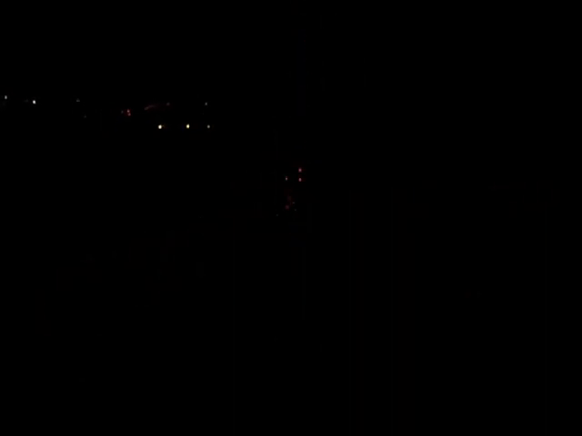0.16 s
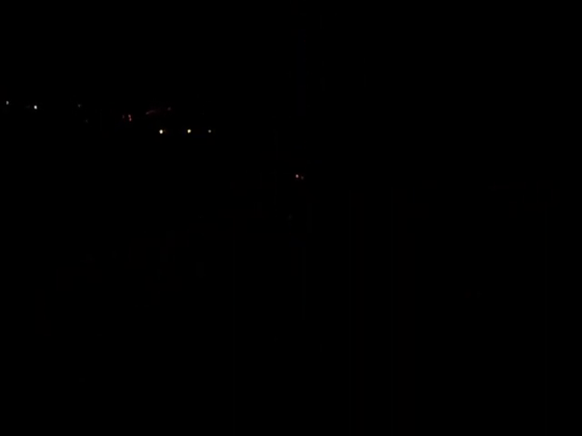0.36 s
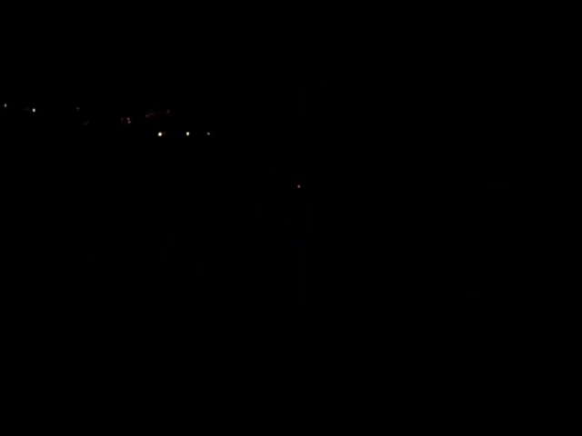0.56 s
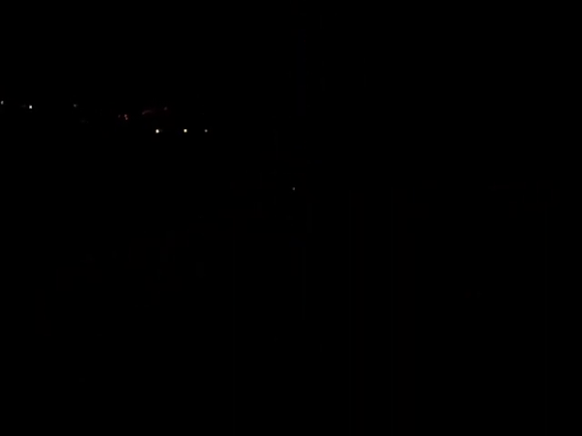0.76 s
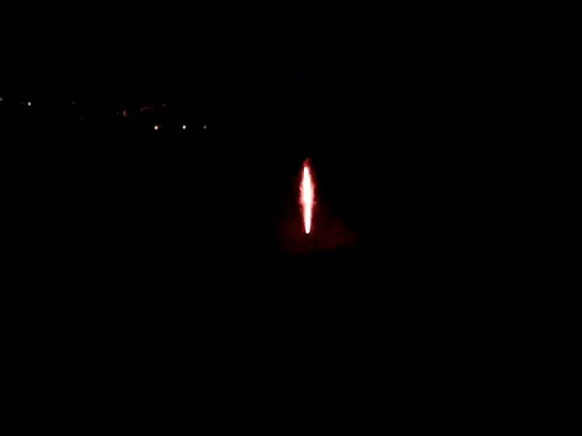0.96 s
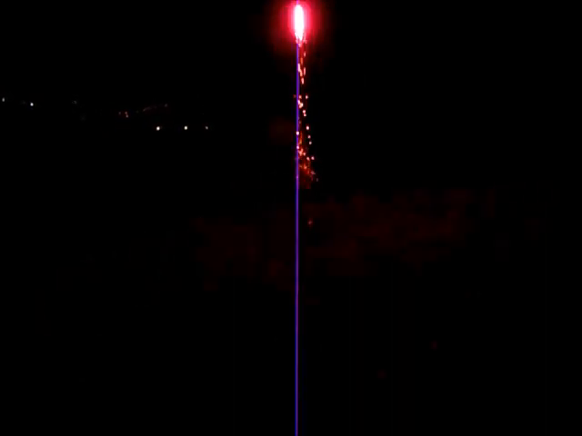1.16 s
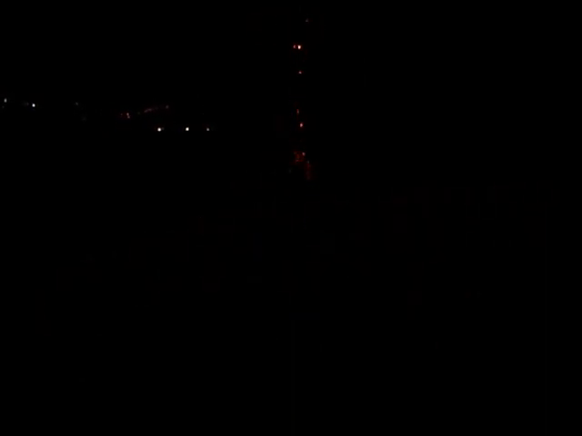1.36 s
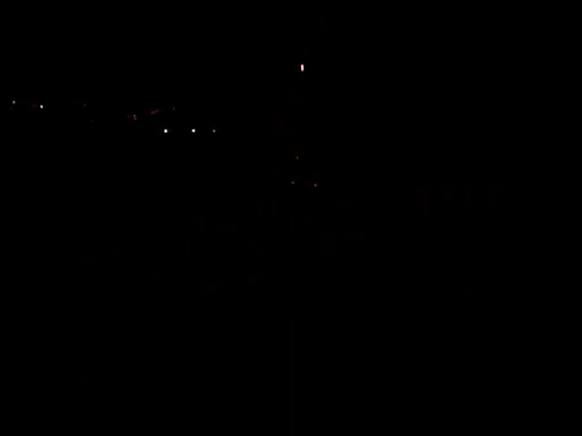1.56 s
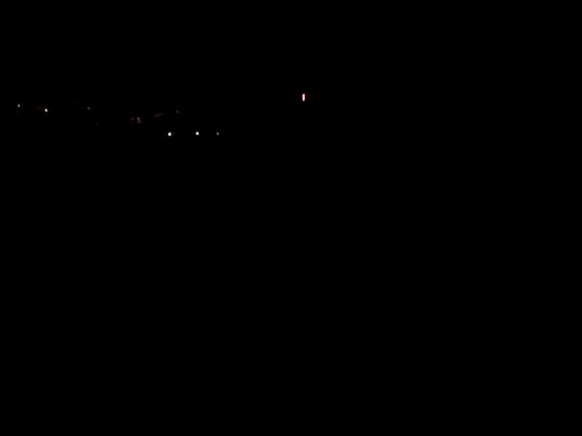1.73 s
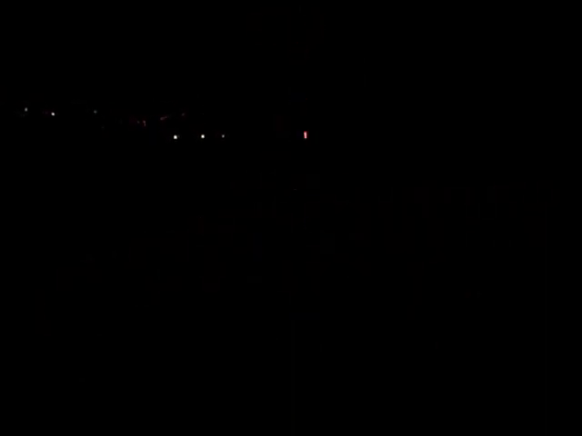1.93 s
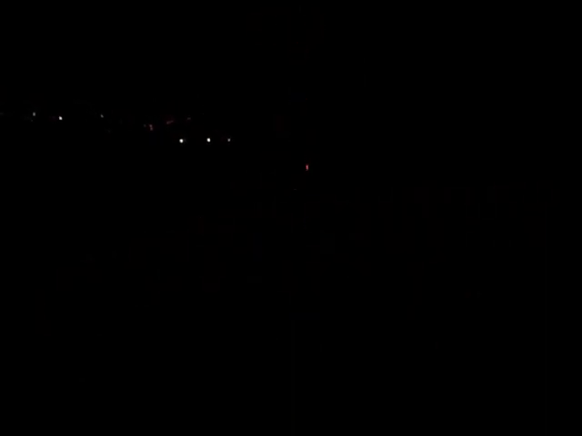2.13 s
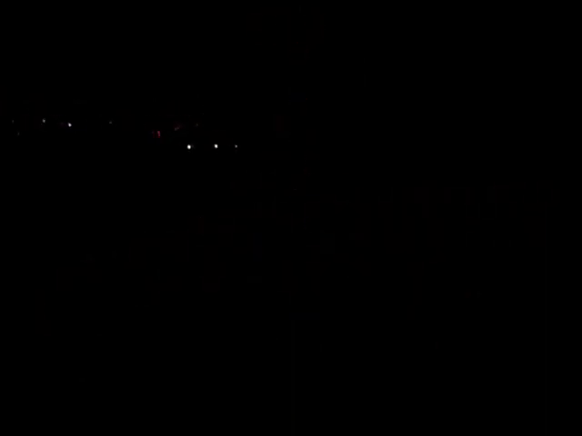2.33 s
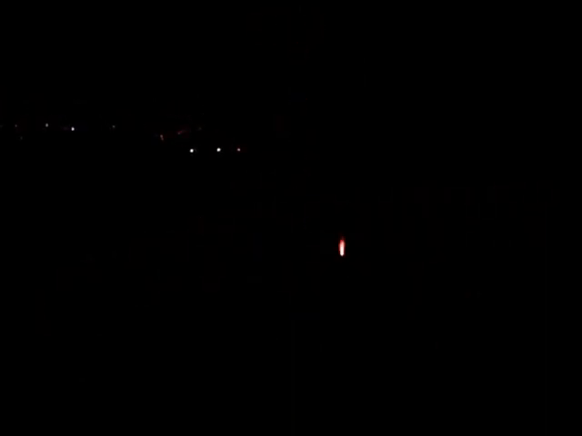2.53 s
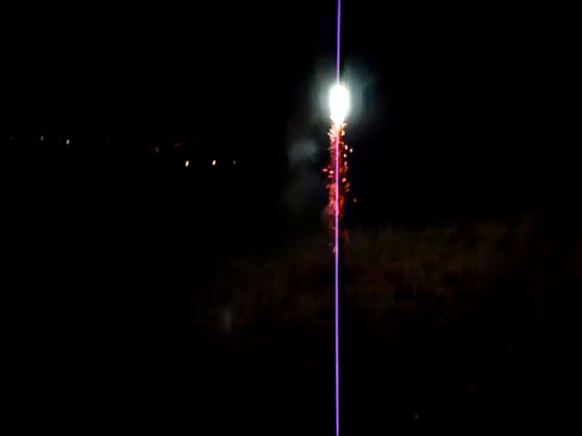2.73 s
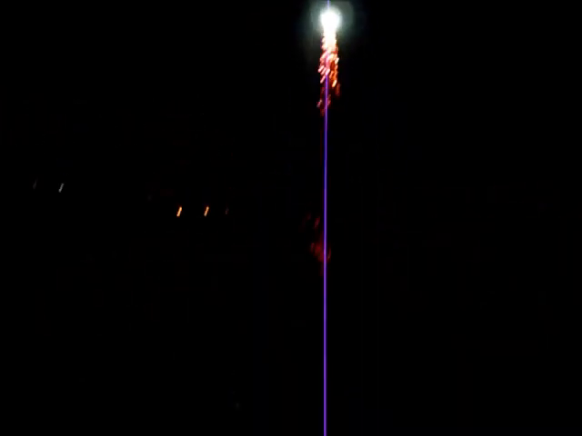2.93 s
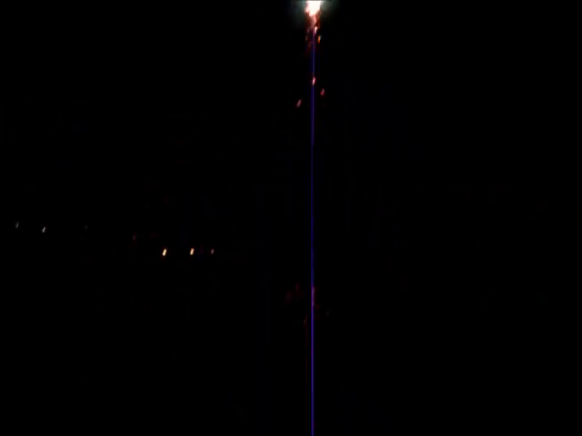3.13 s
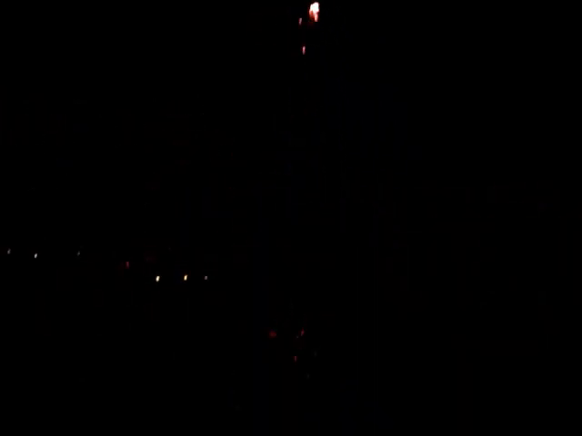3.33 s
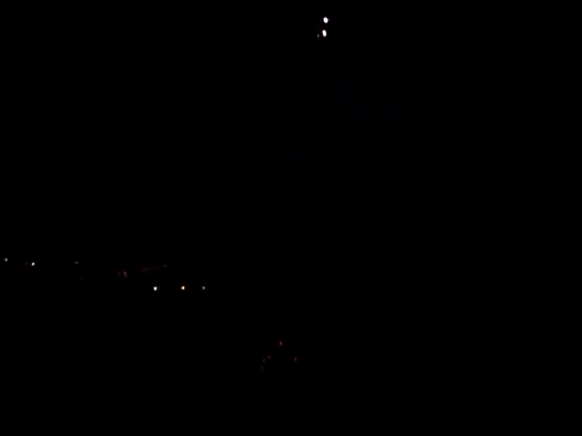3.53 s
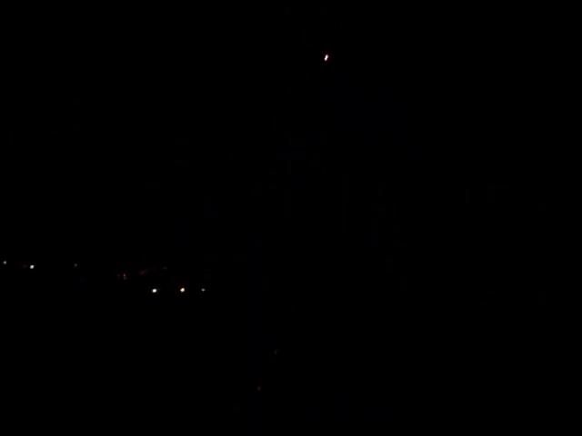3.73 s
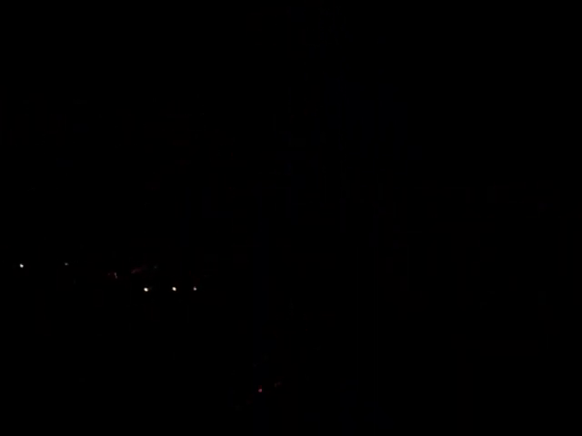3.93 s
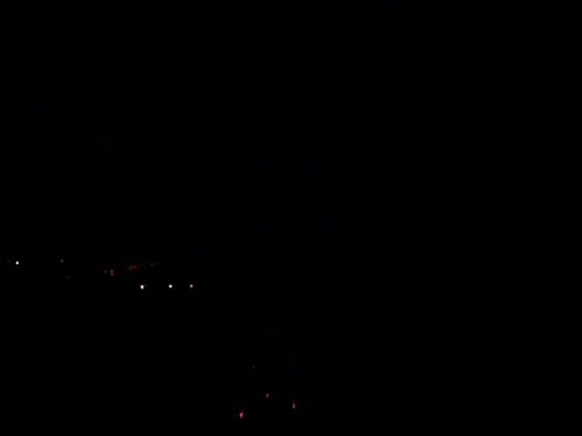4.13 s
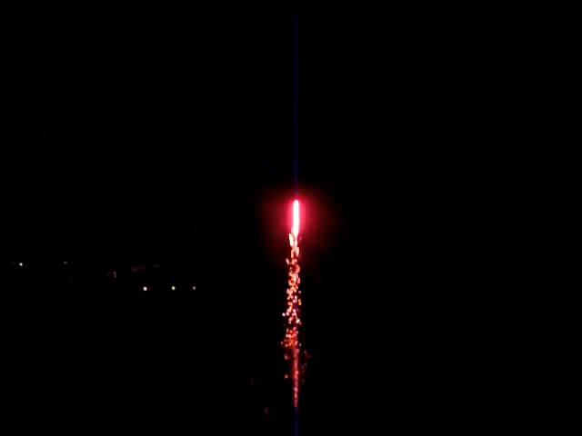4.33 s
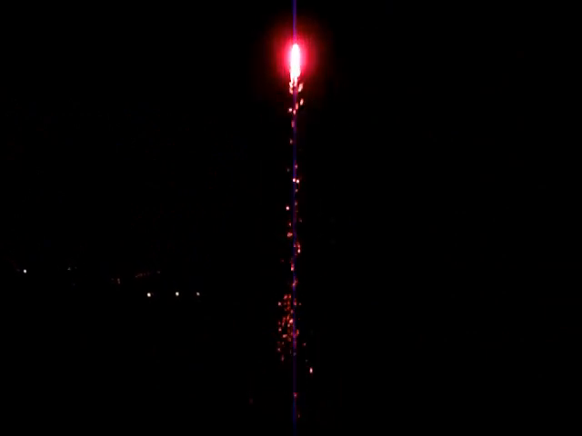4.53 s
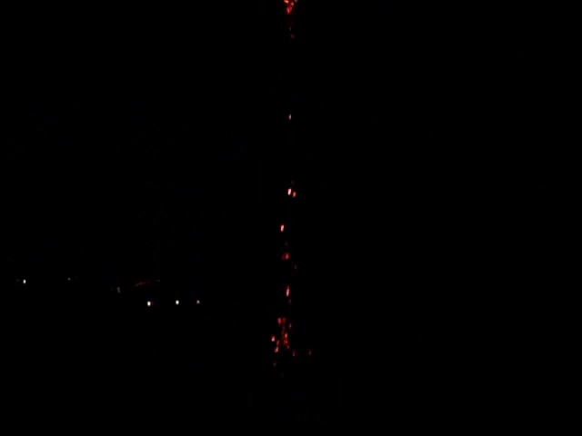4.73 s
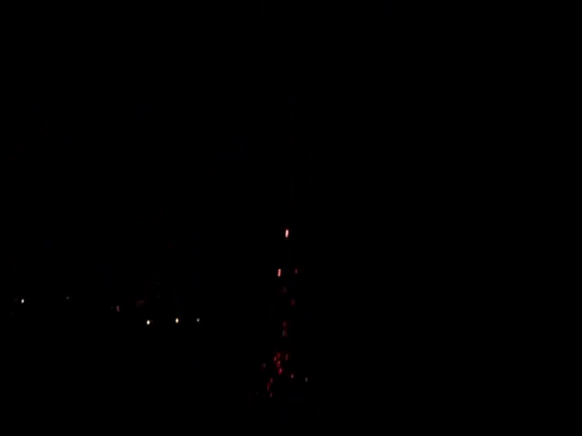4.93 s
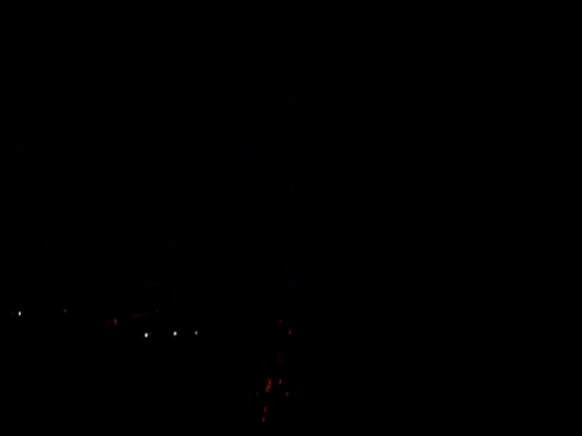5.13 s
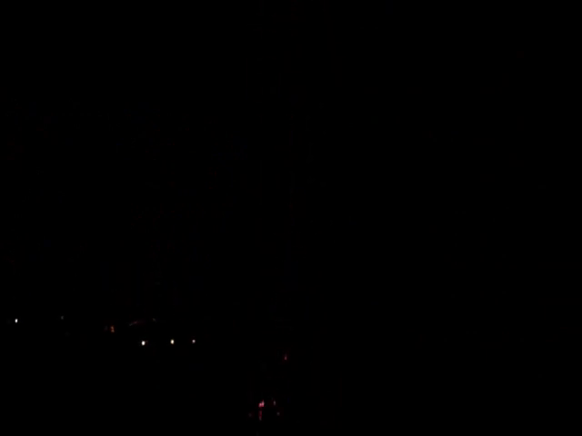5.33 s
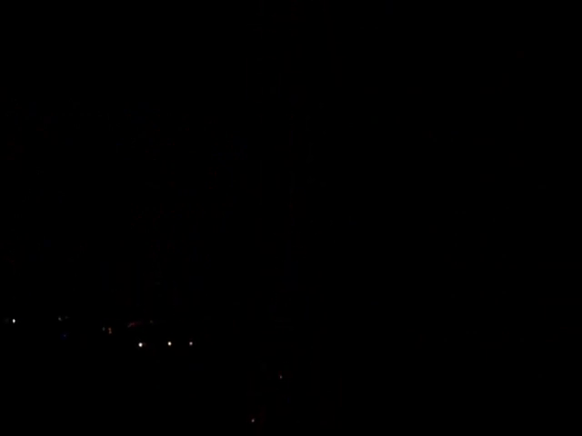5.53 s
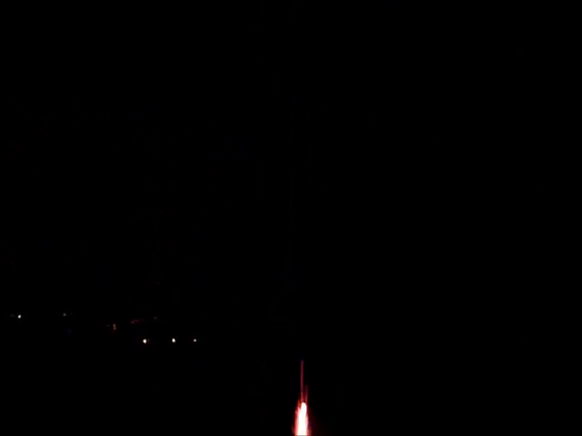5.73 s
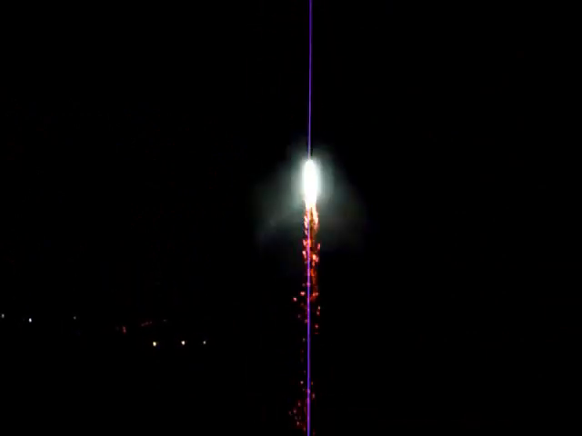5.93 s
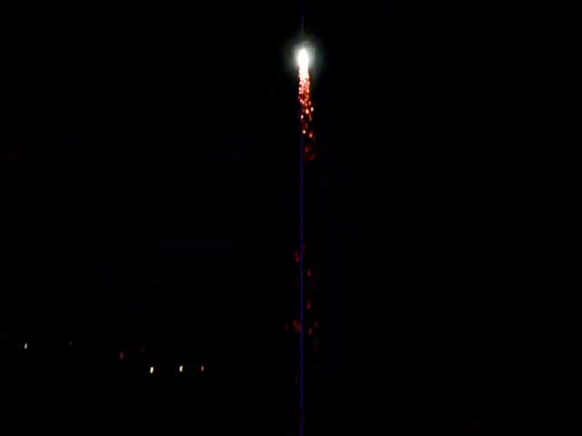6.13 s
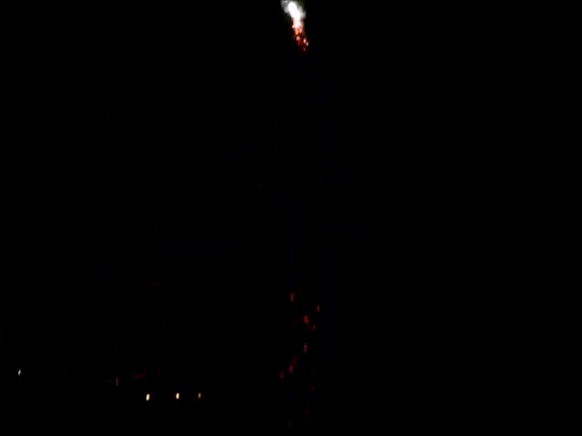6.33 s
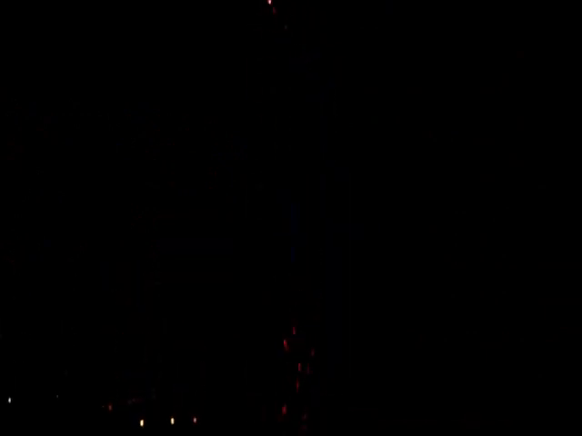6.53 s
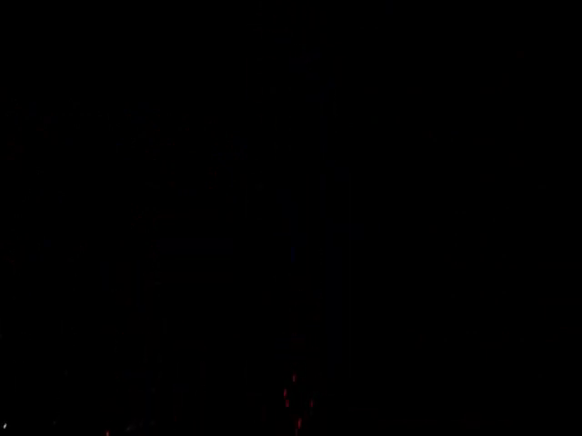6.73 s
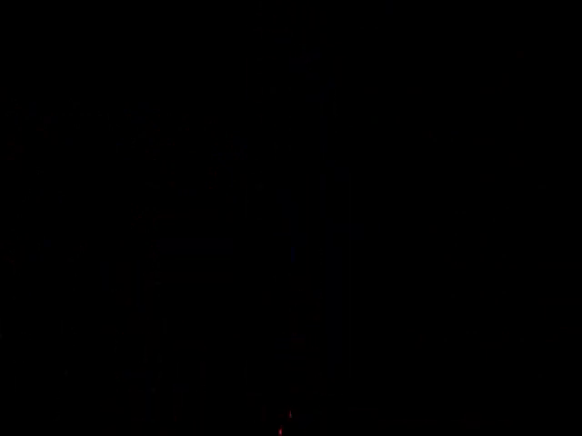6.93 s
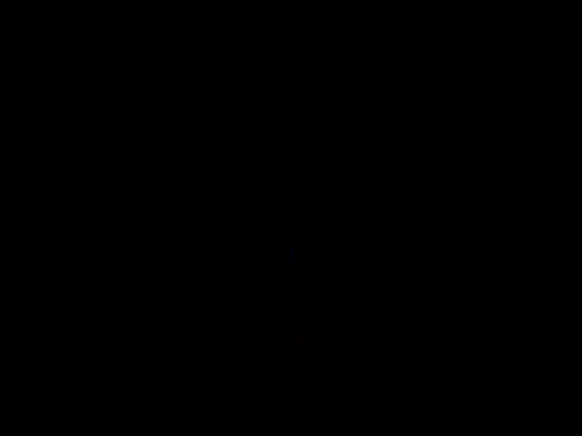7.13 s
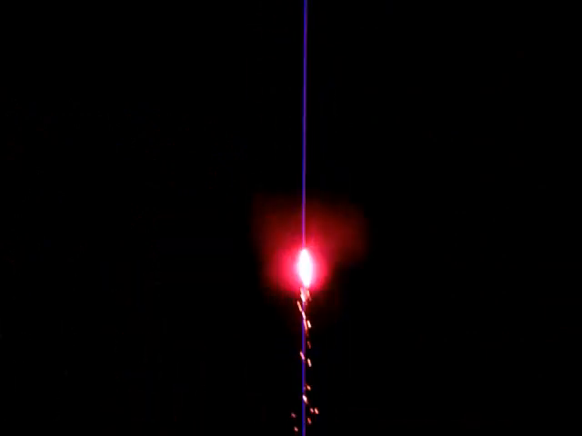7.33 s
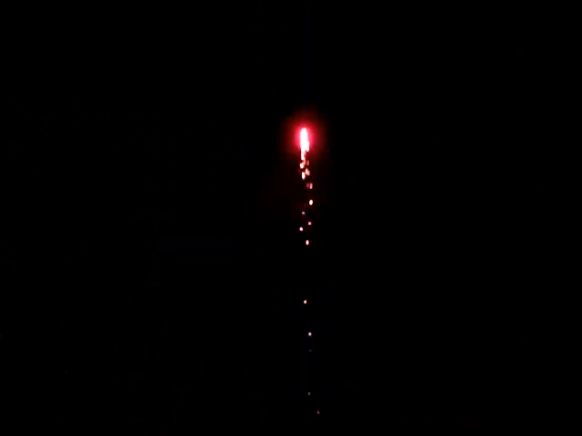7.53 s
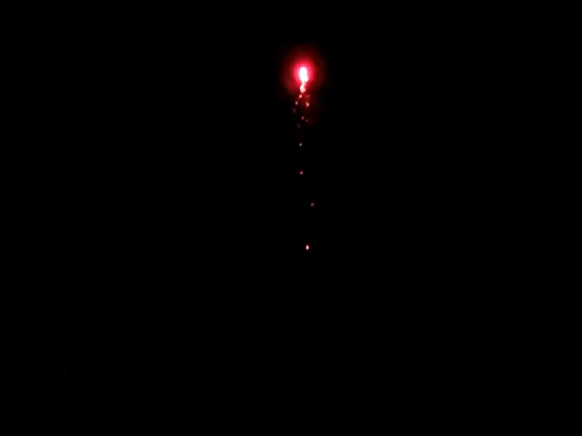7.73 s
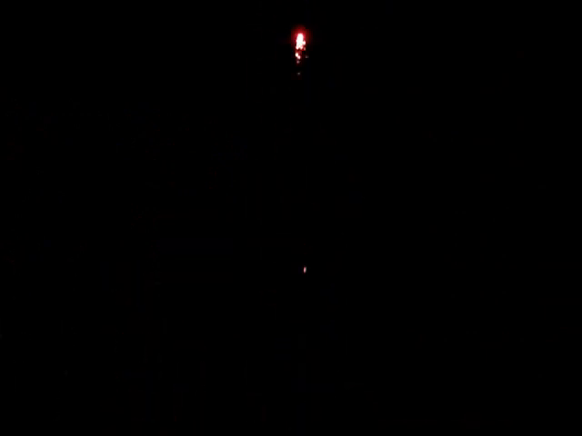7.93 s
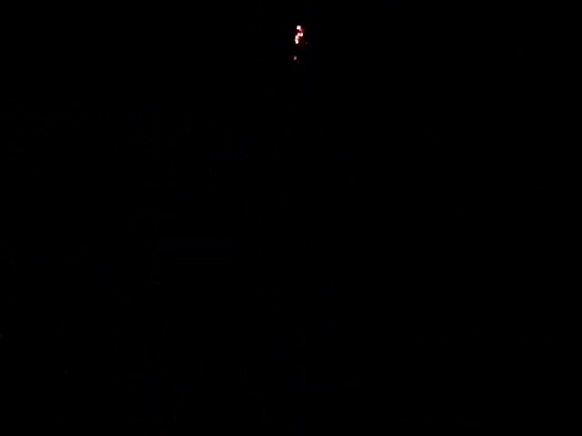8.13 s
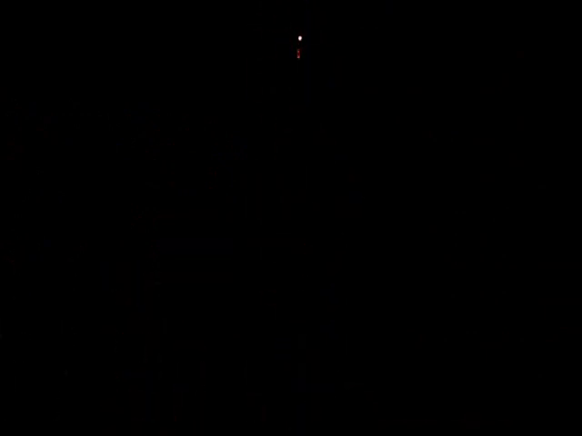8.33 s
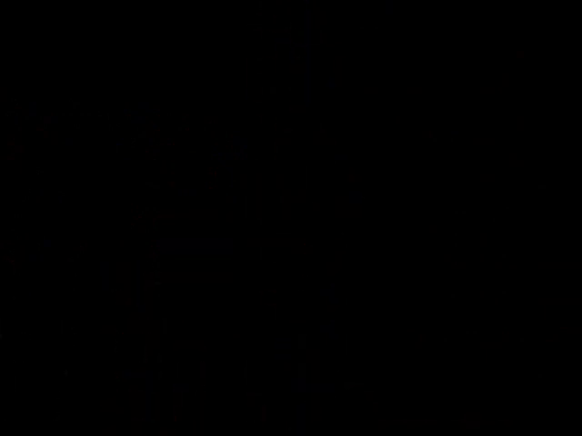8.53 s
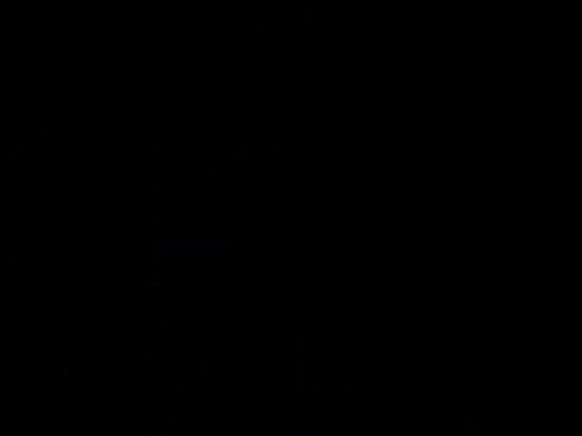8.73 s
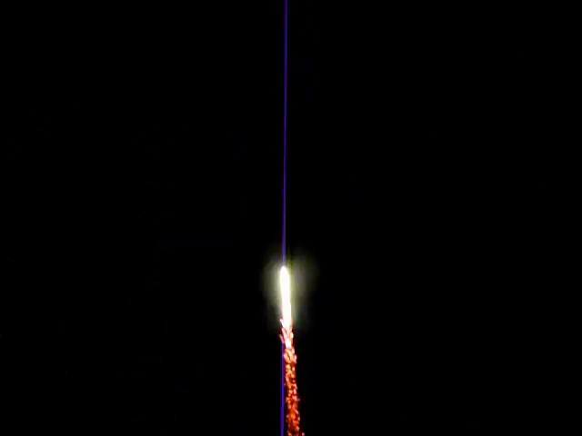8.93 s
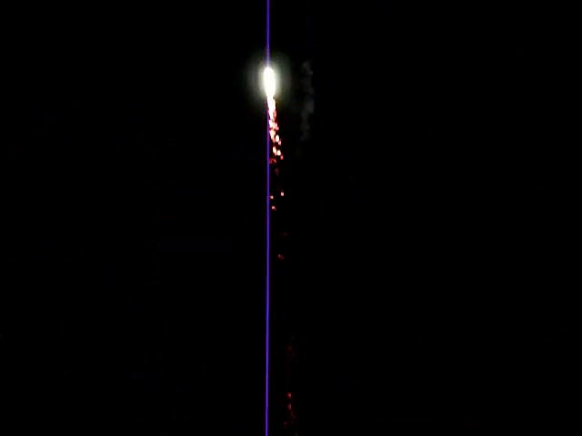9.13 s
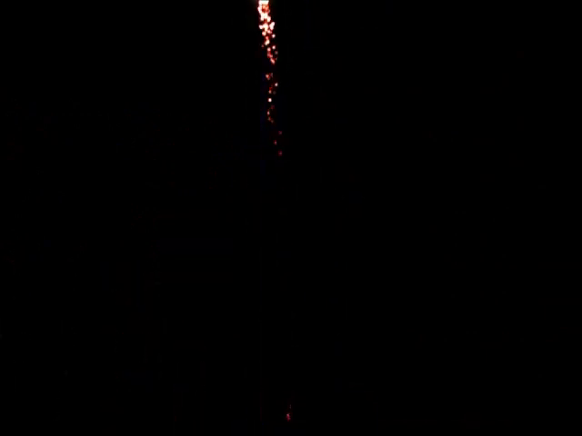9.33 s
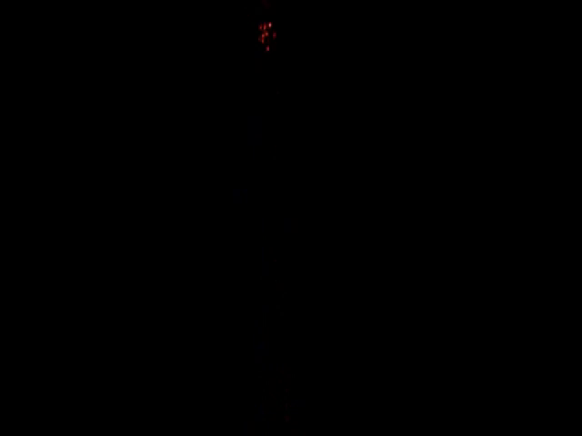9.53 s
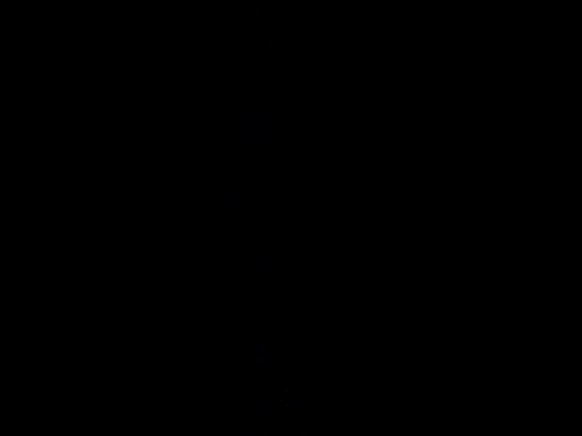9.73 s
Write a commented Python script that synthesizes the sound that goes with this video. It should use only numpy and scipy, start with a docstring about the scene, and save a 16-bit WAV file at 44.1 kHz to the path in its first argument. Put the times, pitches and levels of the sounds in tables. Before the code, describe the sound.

A Roman candle burns a few metres away in an open field at night. A soft fizz comes first, then six sharp bangs at fairly even intervals, the last the loudest. After each shot the burning star hisses and spits, fading as it climbs. Between shots the fuse sputters faintly, with occasional dull ticks of debris and bright spark snaps. A low, distant rush of air lies underneath, heard in stereo.

```python
"""First you hear a soft fizz over a low, far rush of night air; then a bang, the first of six.
A Roman candle is burning a few metres away in an open field. Each bang is a powder charge blowing
a star (a burning pellet) out of the cardboard tube in two rough gusts of gas. The stars fizz and
spit as they climb. Between shots the fuse smoulders, flares and makes the tube ring faintly.
Now and then a bit of debris lands with a dull tick, or a big spark snaps."""
import sys
import numpy as np
from scipy import signal
from scipy.fft import rfft, irfft
from scipy.io import wavfile
from scipy.ndimage import uniform_filter1d

SR = 44100
rng = np.random.default_rng(int(sys.argv[2]) if len(sys.argv) > 2 else 0)


def inscribe(sig):
    """Save sig as 16-bit PCM at rate SR to the path in sys.argv[1].

    A 1-D sig is mono; a 2-D sig holds one channel per row.
    Samples are clipped to [-1, 1] before scaling.
    """
    pcm = np.round(np.clip(np.atleast_2d(sig).T, -1, 1) * 32767)
    wavfile.write(sys.argv[1], SR, pcm.astype(np.int16))


N = 430416
T = np.arange(N) / SR

# How direct sound differs at the two microphones: pitch_hz, left_lead_radians, left_minus_right_db
MIC_DIFFERENCES = [(100, 0.13, 1.5), (450, 0.28, 1), (950, .65, 1), (1600, 0.77, -0.5), (2800, 0.98, -3),
                   (4500, 0.52, -2.5), (6000, 0.4, -2.2), (7560, 0.4, -0.5)]
# Scattered sound compared with direct sound: pitch_hz, level_db
SCATTER = [(60, -2.5), (150, -25.5), (300, -22.5), (520, -15), (900, -11), (1600, -4.5), (2600, -0.5),
           (4500, 0.5), (6500, -3)]
# Tone of the night air: pitch_hz, level_db
AIR_TONE = [(25, -49.5), (60, -34.5), (95, -27), (130, -14.5), (190, -12), (280, 0.5), (420, 3), (800, 2),
            (1150, 0), (1600, -5), (2400, -13), (7000, -26)]
# Loudness of the night air: time_s, level_db
AIR_LEVELS = [(0.0, -55), (2.55, -57.5), (2.74, -53.5), (4.02, -57.5), (4.4, -56), (6.06, -54),
              (6.82, -54.5), (7.01, -52.5), (7.83, -58), (9.76, -55.5)]
# The stars, beginning with one already in the air: flame_db, fizz_db, swell_s, burn_s, fade_s
STARS = [(-55.5, -51.5, .25, 0.82, 0.34), (-55, -49.5, 0.39, 0.894, 0.032), (-52, -49, 0.19, 0.51, 0.38),
         (-53.5, -49, 0.4, 0.97, 0.3), (-50.5, -48.5, .24, 0.29, 0.46), (-55.5, -51.5, 0.37, 0.81, 0.16),
         (-53.5, -52, 0.1, 0.3, 0.76)]
# The fuse flaring in the tube: start_s, length_s, flame_db, fizz_db
FUSE_FLARES = [(0.31, .6, -68.5, -69), (1.86, .38, -64.5, -66), (2.298, 0.37, -59.5, -58.5),
               (3.453, 0.36, -69.5, -71), (3.794, 0.72, -61, -60.5), (5.44, 0.41, -59, -59.5),
               (6.766, 0.29, -58.5, -62), (8.034, 0.38, -65, -68)]
# Spurts of burning powder: middle_s, half_length_s, flame_db, fizz_db
POWDER_SPURTS = [(1.154, 0.065, -52, -51), (4.565, 0.091, -69, -54), (6.326, 0.16, -58.5, -61.5),
                 (6.594, .06, -59, -75), (7.34, 0.039, -52.5, -52.5), (8.874, 0.045, -50, -46)]
# Tone of the flame: pitch_hz, level_db
FLAME_TONE = [(200, -30), (500, 1.5), (900, -4), (1600, 1.5), (2400, 2.5), (3700, 2), (4500, 1.5),
              (5300, -1.5), (6200, 1), (7600, -16.5)]
# Tone of the fizzing metal grains: pitch_hz, level_db
FIZZ_TONE = [(1500, -32.5), (3500, -19.5), (4400, -4), (5000, 3), (5800, 1.5), (7000, 1.5), (7600, -10)]
# The burning shifts from side to side: time_s, left_minus_right_db
SWAY = [(0, 1.5), (1.4, 1.5), (3.1, 1), (4.5, 1.5), (5.25, -5), (6.2, 1.5), (6.8, -4.5), (7.7, 1.5),
        (9.5, 1)]
# The fuse flame singing in the tube: start_s, end_s, pitch_hz, level_db
FUSE_WHISTLES = [(-.2, 0.655, 2640, -62.5), (3.67, 4.2, 3220, -63)]
# Notes the fuse flame rings in the closed tube: pitch_hz, width_hz, level_db
CLOSED_TUBE_NOTES = [(2710, 180, -4.5), (3220, 160, -3), (4440, 170, 0.5), (4630, 150, 0.5),
                     (5200, 150, -3.5)]
# Tone of a gust of gas: pitch_hz, level_db
GUST_TONE = [(30, -40), (90, -31), (160, -12.5), (220, -4.5), (310, -0.5), (400, -7), (600, 0.5),
             (1250, 1.5), (1500, -3.5), (2700, -3.5), (3700, -4.5), (4700, -6.5), (5150, -7.5), (6800, -11),
             (7600, -20.5)]
# Notes of the air in the tube during a gust: pitch_hz, width_hz, level_db
OPEN_TUBE_NOTES = [(800, 380, -17), (1750, 260, -3.5), (2590, 87, -1.5), (3100, 99, -6.5), (3930, 58, -9.5),
                   (4480, 320, -13), (5790, 220, -7.5)]
# The charges that launch the stars: time_s, level_db, rise_ms, fall_ms, bass_db, tilt_db_per_octave,
# low_ring_hz, high_ring_hz, second_delay_ms, second_level_db, second_rise_ms
SHOTS = [(0.9239, -15, 4.4, 21.2, -2, .5, 1730, 2630, 50, -24.5, 6.6),
         (2.566, -17.5, 4.4, 26.6, 1, 1.4, 820, 1820, 47, -28.5, 10.5),
         (4.1808, -16, 4.8, 10.6, -3, 1, 2380, 3040, 31.5, -16, 11.8),
         (5.7224, -17, 2.7, 14.3, 0.5, 1.04, 2890, 4200, 59, -27, 14),
         (7.080, -19, 5.1, 14.2, 1.5, 0.8, 3630, 4500, 52, -29, 13),
         (8.8091, -9.5, 1.8, 7.1, 0, 1, 3400, 4300, 39, -30.5, 20.6)]
# Debris landing: start_s, level_db, pitch_hz, contact_vs_body_db
DEBRIS_TICKS = [(1.031, -29.5, 830, -8), (1.044, -31.5, 720, -6.5), (4.688, -35, 516, -20),
                (5.347, -34.5, 800, -9), (6.14, -29, 630, -17), (6.3266, -35, 1150, 2),
                (6.589, -38, 1410, -8), (6.663, -38.5, 1240, -14), (8.687, -37.5, 1050, -5)]
# Big sparks bursting: start_s, peak_db
SPARK_SNAPS = [(1.627, -29), (1.719, -30), (1.762, -30), (1.777, -24.5), (1.8265, -31), (1.8285, -32),
               (4.589, -24), (4.625, -30), (5.045, -25), (5.102, -31), (7.589, -27), (7.910, -30)]


def gain(db):
    """Turn decibels into a number to multiply by."""
    return 10 ** (np.asarray(db) / 20)


def pitches(n):
    """The frequencies, in Hz, that make up a sound n samples long."""
    return np.maximum(np.fft.rfftfreq(n, 1 / SR), 1)


def by_pitch(table, f, column=1):
    """Read a table's column at the frequencies f, blending between rows."""
    rows = np.array(table)
    return np.interp(np.log(f), np.log(rows[:, 0]), rows[:, column])


def by_time(table):
    """Read a table at every sample, blending between rows."""
    rows = np.array(table)
    return np.interp(T, rows[:, 0], rows[:, 1])


def resonance(f, hz, width_hz):
    """A filter that passes one pitch fully and weakens those around it."""
    return 1 / (1 + 1j * (f * f - hz * hz) / (f * width_hz))


def shaped(x, response):
    """Filter a sound, then set its average strength (rms) to 1."""
    y = irfft(rfft(x) * response, len(x))
    return y / np.std(y)


def wobble(per_s, n=N):
    """A line that glides between random values, typically about 1 in size."""
    step = max(int(SR / per_s), 1)
    levels = uniform_filter1d(np.repeat(rng.standard_normal(n // step + 1), step), step)[:n]
    return levels / np.std(levels)


def crackle(per_s, unevenness_db):
    """A stream of tiny pops of very unequal size."""
    sizes = gain(unevenness_db * np.minimum(rng.exponential(size=N), 6))
    pops = rng.standard_normal(N) * sizes * (rng.random(N) < per_s / SR)
    return pops / np.std(pops)


def left_and_right(x):
    """Direct sound reaches the two microphones at slightly different times and strengths."""
    f = pitches(N)
    lead, louder_db = by_pitch(MIC_DIFFERENCES, f), by_pitch(MIC_DIFFERENCES, f, column=2)
    left = np.exp(0.5j * lead) * gain(louder_db / 2)
    return irfft(rfft(x) * np.array([left, 1 / left]), N)


def wide_noise(mid, side, tone, band_hz, side_db):
    """Make stereo from a direct noise (mid) and a scattered one (side); band_hz sets the level."""
    f = pitches(N)
    colour = gain(by_pitch(tone, f))
    colour /= np.sqrt(np.mean(colour ** 2 * (f > band_hz[0]) * (f < band_hz[1])))
    direct = irfft(rfft(mid) * colour, N)
    scattered = irfft(rfft(side) * colour * gain(by_pitch(SCATTER, f) + side_db), N)
    return left_and_right(direct) + np.array([scattered, -scattered])


def night_air(trim_db=-0.28, flutter_db=0.02):
    """A low, far rush of air that slowly rises and falls."""
    rush = wide_noise(rng.standard_normal(N), rng.standard_normal(N), AIR_TONE, (200, 900), side_db=2.8)
    return rush * gain(by_time(AIR_LEVELS) + trim_db + flutter_db * wobble(22))


def star_power(first_launch_s=-0.72, ignite_s=0.03):
    """Power of flame and fizz: each star lights, swells, fades as it climbs away and burns out."""
    flame_swell_db, fizz_swell_db = 1, 7
    flame_fall_db_per_s, fizz_fall_db_per_s = 5, 8.5
    power = np.zeros((2, N))
    launches = [first_launch_s] + [shot[0] for shot in SHOTS]
    for launch, (flame_db, fizz_db, swell_s, burn_s, fade_s) in zip(launches, STARS):
        age = np.maximum(T - launch, 0)
        alight = np.minimum(age / ignite_s, 1) * np.exp(-np.maximum(age - burn_s, 0) / fade_s)
        unlit = np.maximum(1 - age / swell_s, 0)
        climb_s = np.maximum(age - swell_s, 0)
        flame = flame_db - flame_swell_db * unlit - flame_fall_db_per_s * climb_s
        fizz = fizz_db - fizz_swell_db * unlit - fizz_fall_db_per_s * climb_s
        power += (alight * gain([flame, fizz])) ** 2
    return power


def fuse_power(smoulder_flame_db=-69, smoulder_fizz_db=-68.5, edge_s=0.067):
    """Power of flame and fizz: the fuse smoulders and flares on its way to the next charge."""
    power = gain([[smoulder_flame_db], [smoulder_fizz_db]]) ** 2
    for start, length, flame_db, fizz_db in FUSE_FLARES:
        inside_s = np.minimum(T - start, start + length - T)
        flare = np.clip(inside_s / edge_s + 0.5, 0, 1)
        power = power + (gain([[flame_db], [fizz_db]]) * flare) ** 2
    return power


def burning(flame_trim_db=-0.7, fizz_trim_db=-0.63, flame_share=0.38):
    """Flames hiss and sputter, and burning metal grains add a bright fizz."""
    flame, treble = np.sqrt(star_power() + spurt_power() + fuse_power())
    sputter = gain(0.16 * wobble(25) + 0.49 * wobble(160))
    hiss = wide_noise(crackle(16000, 1.6), crackle(16000, 1.5), FLAME_TONE, (2000, 4000), side_db=-6.5)
    sparks = wide_noise(crackle(9000, 2.0), crackle(9000, 2.2), FIZZ_TONE, (4800, 7400), side_db=-20.5)
    # the sparks carry whatever treble the flame does not
    fizz = np.sqrt(np.maximum(treble ** 2 - flame_share * flame ** 2, treble ** 2 / 10))
    sway = gain(np.array([by_time(SWAY), -by_time(SWAY)]) / 2)
    return sway * sputter * (gain(flame_trim_db) * flame * hiss + gain(fizz_trim_db) * fizz * sparks)


def star_spits(per_s=110, unevenness_db=2.0, vs_fizz_db=-14, hz=5400, width_hz=4500):
    """Small sparks crackle at random as long as a star burns."""
    clicks = shaped(crackle(per_s, unevenness_db), resonance(pitches(N), hz, width_hz) ** 2)
    return gain(vs_fizz_db) * np.sqrt(star_power()[1]) * clicks


def fuse_whistles(width_hz=280):
    """A breathy note swells and fades as the fuse burns down the tube."""
    out = np.zeros(N)
    for start, end, hz, db in FUSE_WHISTLES:
        progress = np.clip((T - start) / (end - start), 0, 1)
        swell = np.sqrt(np.abs(np.sin(np.pi * progress)))
        note = shaped(rng.standard_normal(N), resonance(pitches(N), hz, width_hz) ** 2)
        out += gain(db) * swell * note
    return out


def tube_ring(vs_flame_db=-7):
    """The fuse flame gives the tube a faint hollow ring."""
    f = pitches(N)
    notes = sum(gain(db) * resonance(f, hz, width) ** 2 for hz, width, db in CLOSED_TUBE_NOTES)
    return gain(vs_flame_db) * np.sqrt(fuse_power()[0]) * shaped(rng.standard_normal(N), notes)


def gust(rise_ms, fall_ms, tilt_db, low_hz, high_hz, bass_db):
    """A rough jet of gas rushes out of the tube, 0.1 s into the returned sound."""
    ring_gain, ring_width_hz, rough_db, bass_edge_hz = 1.18, 200, 1.5, 330
    lag_ms, linger = 1.0, 0.075  # each octave down comes later and lasts longer
    ms = np.arange(-SR // 10, SR // 3) * 1000 / SR
    n = len(ms)
    f = pitches(n)
    tube = 1 + sum(gain(db) * resonance(f, hz, width) for hz, width, db in OPEN_TUBE_NOTES)
    # the star in the tube adds two ringing notes
    tube += ring_gain * (resonance(f, low_hz, ring_width_hz) + resonance(f, high_hz, ring_width_hz))
    colour = gain(by_pitch(GUST_TONE, f) + tilt_db * np.log2(np.maximum(f, 1000) / 2000))
    # the more sudden the gust, the more bass it pushes out
    thump_db = bass_db + 4 * np.log2(3.3 / rise_ms)
    colour *= gain(thump_db / (1 + (f / bass_edge_hz) ** 4))
    rough_noise = rng.standard_normal(n) * gain(rough_db * wobble(1200, n))
    jet = rfft(shaped(rough_noise, tube * colour))
    octaves, out = np.arange(-4, 3), 0  # counted from 2000 Hz
    for octave in octaves:
        band = irfft(jet * np.interp(np.log2(f / 2000), octaves, 1.0 * (octaves == octave)), n)
        age_ms = ms + lag_ms * octave
        band_fall_ms = fall_ms * 2 ** (-linger * octave)
        out += band * np.exp(-np.logaddexp(-age_ms / rise_ms, age_ms / band_fall_ms))
    return out


def shots():
    """Each charge cracks; a duller gust follows as the star clears the tube."""
    out = np.zeros(N)
    for (s, db, rise_ms, fall_ms, bass_db, tilt_db, low_hz, high_hz,
         delay_ms, second_db, second_rise_ms) in SHOTS:
        start = s - 0.1
        add(out, start, gain(db) * gust(rise_ms, fall_ms, tilt_db, low_hz, high_hz, bass_db))
        # the emptied tube always rings at the same two pitches
        second = gust(second_rise_ms, fall_ms=0.85 * second_rise_ms,
                      tilt_db=0.7, low_hz=870, high_hz=2830, bass_db=5.5)
        add(out, start + delay_ms / 1000, gain(second_db) * second)
    return out


def add(out, start_s, x):
    """Mix a short sound into a longer one."""
    i = int(start_s * SR)
    out[i:i + len(x)] += x[:N - i]


def field_echo(x, fade_60_db_s=0.42, build_s=0.0067, echo_db=-25, dull_hz=2200):
    """Ground and hedges scatter a thin, dull echo."""
    t = T[:SR]
    muffle = 1 / (1 + 1j * pitches(SR) / dull_hz)
    tail = np.array([shaped(rng.standard_normal(SR), muffle) for _ in range(2)])
    tail = tail * gain(-60 * t / fade_60_db_s) * (1 - np.exp(-t / build_s))
    mid, side = signal.fftconvolve(x[None], tail / np.linalg.norm(tail[0]), axes=1)[:, :N]
    return gain(echo_db) * np.array([mid + side / 2, mid - side / 2])


def debris_ticks(contact_hz=4300, contact_width_hz=2300, contact_ms=0.98):
    """Bits of debris land: a bright click on contact, and two notes that die at once."""
    overtone_ratio, body_width_hz, decay_ms = 1.62, 1900, 1.9
    out, n = np.zeros(N), SR // 10
    t, ms, f = T[:n], 1000 * T[:n], pitches(n)
    for s, db, hz, contact_db in DEBRIS_TICKS:
        notes = np.sin(2 * np.pi * hz * t) - np.sin(2 * np.pi * hz * overtone_ratio * t) / 2
        body = notes * np.exp(-ms / decay_ms)
        # so small a thing gives off no bass
        body = irfft(rfft(body) * resonance(f, hz, body_width_hz) ** 2, n)
        contact = shaped(rng.standard_normal(n), resonance(f, contact_hz, contact_width_hz) ** 2)
        contact *= np.exp(-ms / contact_ms)
        add(out, s, gain(db) * (body + gain(contact_db) * contact))
    return out


def spurt_power():
    """Power of flame and fizz: loose powder catches and dies in short, rounded spurts."""
    power = np.zeros((2, N))
    for middle_s, half_s, flame_db, fizz_db in POWDER_SPURTS:
        hump = np.exp(-np.minimum(((T - middle_s) / half_s) ** 2, 20))
        power += gain([[flame_db], [fizz_db]]) ** 2 * hump
    return power


def spark_snaps(hz=5600, width_hz=4200):
    """Single big sparks burst with one sharp, bright click."""
    out = np.zeros(N)
    click = irfft(resonance(pitches(SR // 10), hz, width_hz) ** 2)
    for s, db in SPARK_SNAPS:
        add(out, s, gain(db) * click / np.abs(click).max())
    return out


def scene():
    """The candle in its field, in stereo."""
    bangs = shots()
    direct = left_and_right(bangs + fuse_whistles() + tube_ring() + debris_ticks())
    return direct + spark_snaps() + star_spits() + field_echo(bangs) + burning() + night_air()


def record(dry, top_hz=8350):
    """Cut away the treble above about 8 kHz."""
    return signal.sosfilt(signal.cheby2(16, 62, top_hz, fs=SR, output="sos"), dry)


dry = scene()
out = record(dry)
inscribe(out)
```